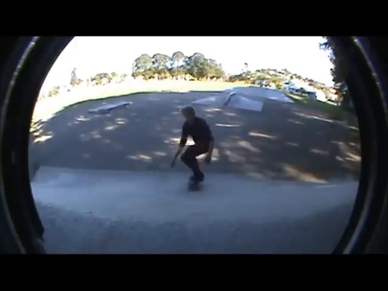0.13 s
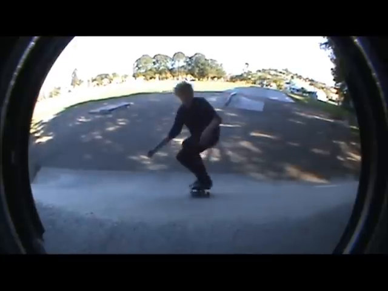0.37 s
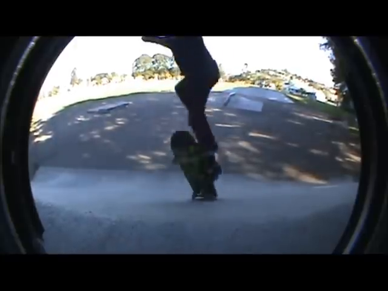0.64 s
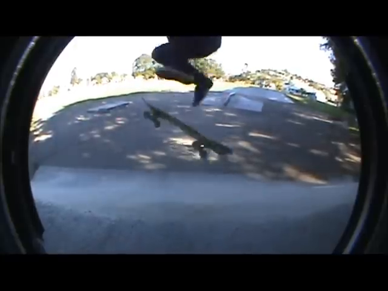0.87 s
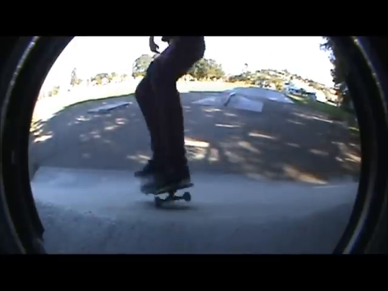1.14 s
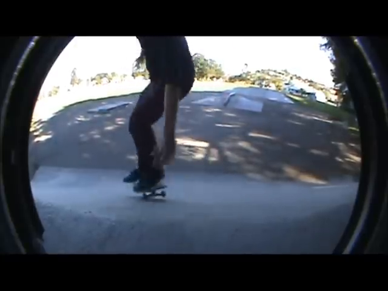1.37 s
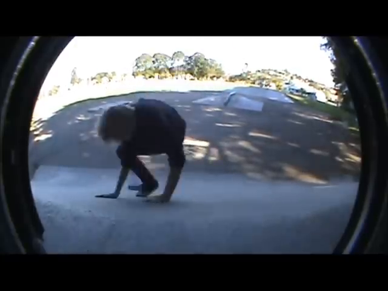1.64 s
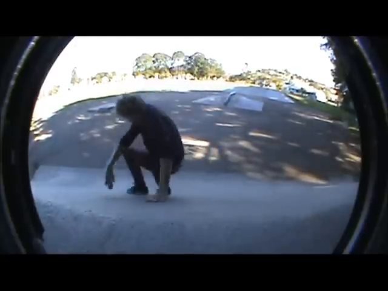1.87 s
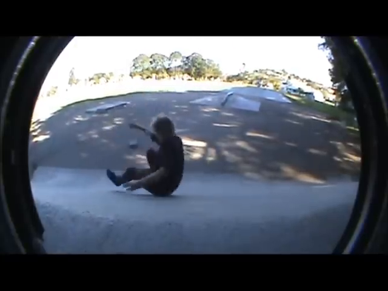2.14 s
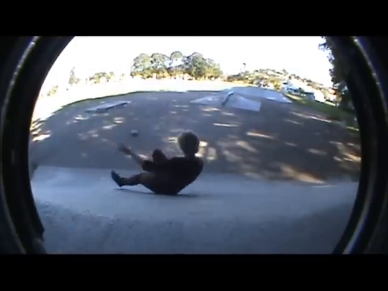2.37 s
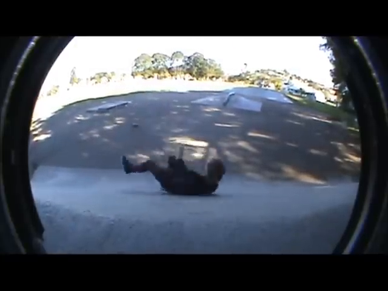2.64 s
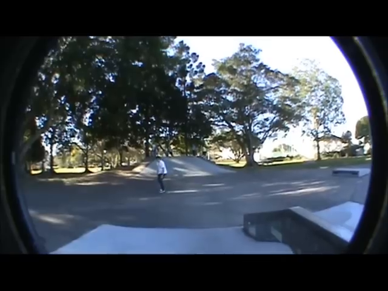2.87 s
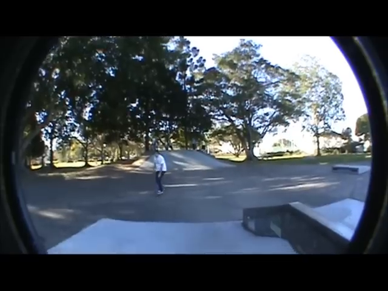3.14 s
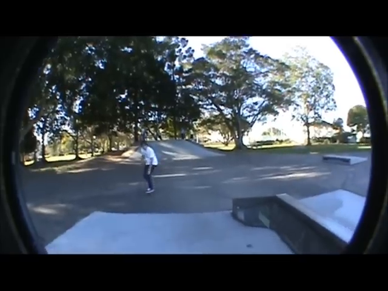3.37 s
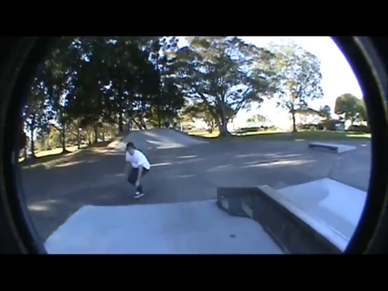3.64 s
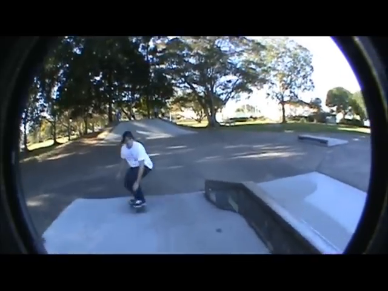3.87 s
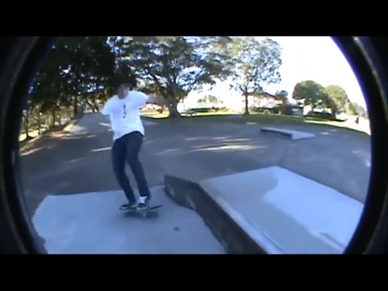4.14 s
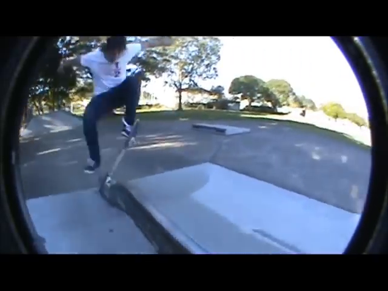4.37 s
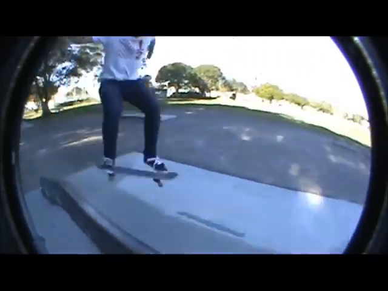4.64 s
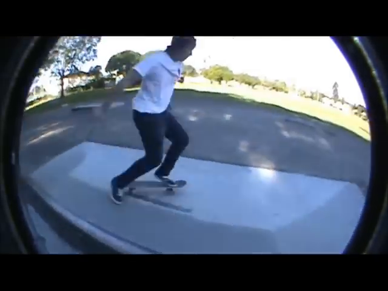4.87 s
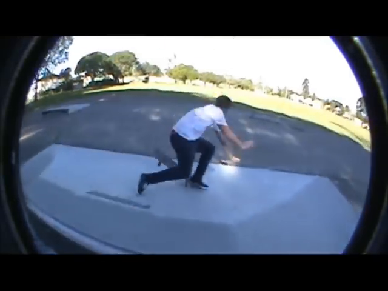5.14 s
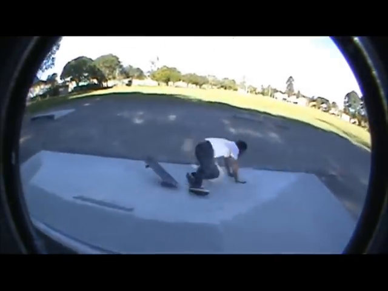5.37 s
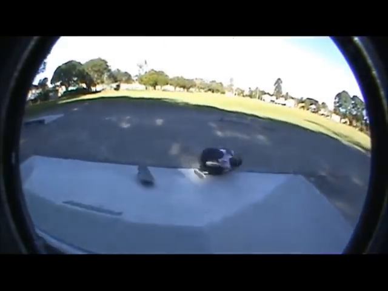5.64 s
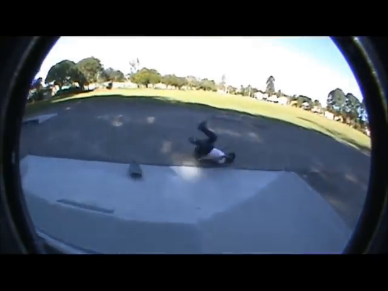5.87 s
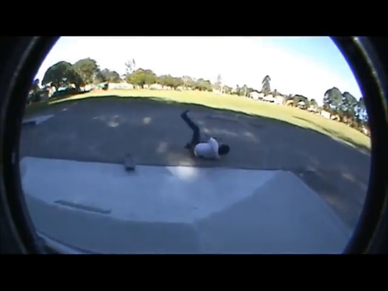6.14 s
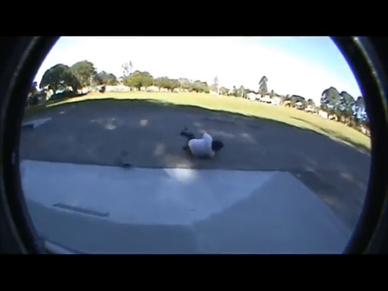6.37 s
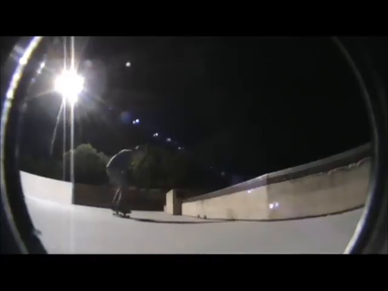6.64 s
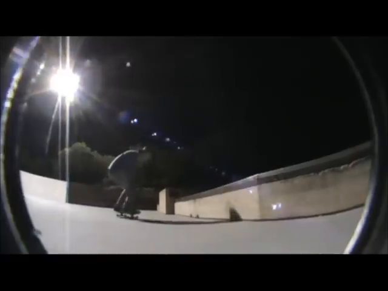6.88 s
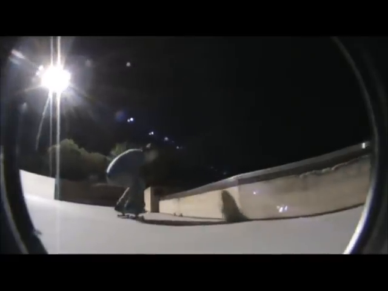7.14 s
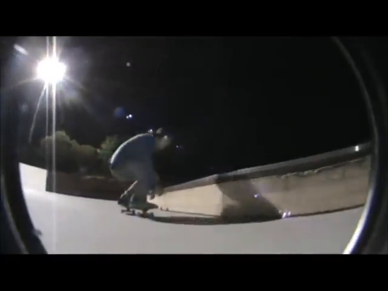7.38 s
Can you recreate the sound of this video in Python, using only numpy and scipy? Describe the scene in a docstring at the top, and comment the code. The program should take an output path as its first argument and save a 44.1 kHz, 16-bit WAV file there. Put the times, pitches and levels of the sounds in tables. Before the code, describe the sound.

Skateboard wheels roar over rough concrete, a sharp pop, clattering landing and scraping tumble, brief silence, a second trick and crash, then another roll.

```python
"""Three short takes at a skatepark, joined by silent gaps: a board rolls up, pops, lands and clatters
away, twice, the deck humming upward around the second pop; then a board rolls by.
Grit and blows drive noise through the colours of deck, wheels and metal trucks; struck modes ring.
Wind and ground rumble are low noise throughout; a far engine, three low sines, lies under two takes.
A close pair of microphone ports hears it all through a fast gain control."""
import sys
import numpy as np
from scipy import signal
from scipy.fft import rfft, irfft, next_fast_len
from scipy.io import wavfile
from scipy.ndimage import uniform_filter1d, map_coordinates

SR = 44100
rng = np.random.default_rng(int(sys.argv[2]) if len(sys.argv) > 2 else 0)


def wrap_up_sound(samples):
    """Save the sound to the file named by the first command line argument, as 16-bit audio."""
    columns = np.atleast_2d(samples).T
    # keep every value between -1 and 1, then stretch to whole-number steps
    tamed = np.clip(columns, -1, 1)
    steps = np.round(tamed * 32767).astype(np.int16)
    wavfile.write(sys.argv[1], SR, steps)


def natural_amplitude(level_db):
    """Convert a level in decibels to a linear amplitude factor, elementwise."""
    exponent = np.asarray(level_db, float) / 20
    return 10 ** exponent


N = 331054

# Silent gaps between the takes: start_s, end_s
GAPS = [(2.6405, 2.7068), (6.4898, 6.5775)]
# Borders of the eight stages (ride, trick, loose; ride, flight, landing, loose; ride): border_s
STAGES = [0, .535, 1.5, 2.68, 4.235, 4.752, 5.4, 6.53, 8]


def unit(x):
    """Normalisation: scale a signal to an rms of 1."""
    return x / np.sqrt(np.mean(x ** 2) + 1e-20)


def along(points, hz):
    """Logarithmic pitch scale: interpolate (frequency_hz, value) points on a log axis."""
    f, v = np.transpose(points)
    return np.interp(np.log(hz + 1), np.log(f + 1), v)


def curves(rows):
    """Linear interpolation in time: one value per sample for each column after time_s."""
    s, *cols = np.transpose(rows)
    return [np.interp(np.arange(N) / SR, s, c) for c in cols]


def wobble(rate):
    """Slow random modulation: a smooth random curve with the given number of knots a second."""
    knots = rng.standard_normal(int(N * rate / SR) + 4)
    return map_coordinates(knots, [np.arange(N) * rate / SR])


def response(spectrum, size=4096):
    """Minimum phase: the causal impulse response of energy 1 with the given colour."""
    level_db = np.maximum(along(spectrum, np.fft.rfftfreq(size, 1 / SR)), -70)
    cepstrum = irfft(np.log(natural_amplitude(level_db)))
    # folding the cepstrum onto positive time makes the response causal
    cepstrum[1:size // 2] *= 2
    cepstrum[size // 2 + 1:] = 0
    h = irfft(np.exp(rfft(cepstrum)))
    return h / np.linalg.norm(h)


def ring(force, colours, borders=STAGES):
    """Source and filter: each stretch of the force is convolved with that stretch's colour."""
    out = np.zeros((2, N + 4096))
    for a, b, colour in zip(borders, borders[1:], colours):
        first, last = round(a * SR), round(b * SR)
        piece = signal.fftconvolve(force[:, first:last], response(colour)[None], axes=1)
        out[:, first:][:, :piece.shape[1]] += piece  # the tail rings on into the next stretch
    return out[:, :N]


def grit(per_second, spread_db, t60):
    """Shot noise: stones met at random, each a sudden jolt that dies exponentially."""
    count = int(per_second * N / SR)
    sizes = natural_amplitude(spread_db * rng.standard_normal(count))
    stones = np.bincount(rng.integers(0, N, count), sizes, N)
    return unit(signal.lfilter([1], [1, -natural_amplitude(-60 / (t60 * SR))], stones))


def patchy(depth_db):
    """Non-stationary noise: two noises whose strength drifts in shared patches of pitch and time."""
    z = signal.stft(rng.standard_normal((2, N)), nperseg=512)[2]
    over_pitch = uniform_filter1d(rng.standard_normal(z.shape[1:]), size=4, axis=0)
    field = unit(uniform_filter1d(over_pitch, size=5, axis=1))
    return unit(signal.istft(z * natural_amplitude(depth_db * field), nperseg=512)[1][:, :N])


# Unbroken rolling or sliding, one table a spell: time_s, strength_db, deck_weight_db
RIDES = [
    [(0, -18.5, -5.5), (.2, -20.5, 0), (.37, -22.5, 5), (.43, -29.5, 6), (.52, -24, 3.5), (.56, -27, 0),
     (.597, -35, 7.5)],
    [(2.07, -41.5, 12), (2.1, -28.5, 5), (2.3, -27, -2), (2.46, -26.5, -2.5), (2.53, -28, -5),
     (2.575, -34, 1), (2.6, -28, -6.5), (2.645, -31, 0)],
    [(2.7, -24, -4.5), (2.8, -31, 2.5), (3.1, -26.5, 2.5), (3.33, -23, -3), (3.45, -23.5, -6),
     (3.66, -23.5, -0.5), (3.8, -21, -5), (3.95, -25, 3), (4.12, -23.5, -1.5), (4.225, -24.5, -10)],
    [(5.932, -23.5, -2), (6.1, -21, 1), (6.28, -21, -7), (6.31, -31, -5), (6.33, -20.5, -8.5),
     (6.37, -20.5, 13), (6.405, -31, -15), (6.42, -22.5, -6.5), (6.495, -27, 1)],
    [(6.57, -21, -8), (6.65, -18, -7), (6.8, -19, 2), (7.06, -19, -2), (7.18, -20.5, 2), (7.3, -17, -0.5),
     (7.51, -29, 10)],
]
# Short scrapes and touches of the ground: start_s, length_s, first_db, last_db, deck_weight_db
SCRAPES = [(0.596, 0.061, -30.5, -26, 4), (0.682, 0.051, -24.5, -23, -7.5), (0.736, 0.17, -24, -46, -7.5),
           (1.039, 0.062, -26.5, -26, -5.5), (1.143, 0.08, -22, -29.5, 2), (1.212, 0.08, -27, -35.5, 1),
           (1.255, 0.09, -30, -29, 3.5), (1.341, 0.07, -27.5, -21, 1), (1.545, 0.036, -40, -37, 6),
           (1.562, 0.044, -24, -32.5, 5.5), (1.605, 0.078, -17.5, -39, 4.5), (1.67, 0.052, -28, -29, 1),
           (1.736, 0.044, -24.5, -18.5, 3), (1.802, 0.047, -22, -21, 2), (1.863, 0.054, -24.5, -29, 9),
           (1.93, 0.035, -30.5, -20, -2.5), (1.975, 0.039, -20, -19.5, 3.5), (2.027, 0.03, -29.5, -28.5, 4),
           (4.247, 0.097, -21, -25, 2.5), (4.353, 0.088, -25.5, -37.5, -1), (4.486, 0.071, -33, -30, -8),
           (4.58, 0.14, -28, -34.5, -3), (4.762, 0.04, -24, -23, 3), (4.812, 0.051, -24.5, -31, 1),
           (4.853, 0.031, -25, -24, 1.5), (4.884, 0.096, -23, -24, -17), (5, 0.16, -19.5, -32, -6),
           (5.145, 0.13, -29.5, -41, -3.5), (5.416, 0.061, -27, -30, 1), (5.497, 0.05, -22, -19.5, 0.5),
           (5.56, 0.049, -20.5, -27, 6), (5.725, 0.12, -25, -30.5, 0), (5.854, 0.13, -27.5, -26, -10)]
# Gain for each dB of weight, for rumble, deck, wheels, trucks: gain_db_per_db
PER_WEIGHT = [1, 0.69, -0.035, -0.085]
# Share of the strength in each stage, the second loose one split at settling: rumble_db, deck_db, trucks_db
SHARE = [(-11.5, 6, -8.5), (-15, 4.5, -2.5), (-13.5, -3.5, -5.5), (-9, 9, -4.5), (-30, -1, -5.5),
         (-18, 2.5, -3.5), (-12, -6.5, -5.5), (-30.5, -11, -16), (-15, 1.5, -15)]
IDLE = [(-40.5, -43.5, -43, -39.5), (-45.5, -36.5, -34.5, -36)]


def shaking():
    """Addition of powers: contacts build up and let go exponentially; gives rumble, deck, wheels, trucks in dB."""
    touch_s, lift_s = 0.00049, 0.015  # time constants of contact and release
    settle_s = 5.68  # the fallen board stops skidding and rolls on its wheels
    t, power = np.arange(N) / SR, np.zeros((4, N))
    scrapes = [[(s, first_db, weight_db), (s + length, last_db, weight_db)]
               for s, length, first_db, last_db, weight_db in SCRAPES]
    for rows in RIDES + scrapes:
        s, db, weight_db = np.transpose(rows)
        span = slice(round(s[0] * SR), round(s[-1] * SR) + SR // 10)
        u = t[span]
        build_up = 1 - np.exp(-np.abs(u - s[0]) / touch_s)
        let_go = np.exp(-np.maximum(u - s[-1], 0) / lift_s)
        level_db = np.interp(u, s, db) + np.outer(PER_WEIGHT, np.interp(u, s, weight_db))
        power[:, span] += (build_up * let_go * natural_amplitude(level_db)) ** 2
    stage = np.searchsorted(sorted(STAGES + [settle_s]), t, side="right") - 1
    share = natural_amplitude(np.insert(np.transpose(SHARE), 2, 0, axis=0))[:, stage]  # wheels stay at 0 dB
    idle = natural_amplitude(np.transpose(IDLE))[:, (t > GAPS[0][1]).astype(int)]
    return 10 * np.log10(power * share ** 2 + idle ** 2)


# Colours of the deck, stage by stage, with extra borders at arrival, crouch and
# rougher ground: frequency_hz, level_db_per_hz
DECK = [
    [(110, -40), (180, -13), (433, -7.5), (478, -3.5), (953, -8.5), (1100, -36), (1430, -16), (2420, -120)],
    [(110, -40.5), (180, -2.5), (464, 0.5), (633, -2.5), (788, 5), (1100, -11), (1430, -33), (2420, -120)],
    [(110, -13.5), (180, -15.5), (294, -7), (450, -1), (620, -2.5), (760, -1), (883, 4.5), (1000, -3.5),
     (1150, -8), (1430, -53), (2420, -120)],
    [(110, -25), (180, -18), (380, -1), (520, -6.5), (760, 1.5), (1100, -15), (2420, -120)],
    [(110, -48), (180, -11), (313, -7), (378, -4.5), (536, -4), (700, 5.5), (790, 5.5), (930, -9),
     (1100, -20), (1430, -57), (2420, -120)],
    [(110, -31.5), (180, -10.5), (348, -12), (548, 3.5), (680, -0.5), (790, 2), (940, -15), (1100, -43),
     (1430, -42), (2420, -120)],
    [(110, -52), (180, -9), (318, -1.5), (440, -8), (782, 7.5), (1100, -31), (1430, -45), (2420, -120)],
    [(110, -43), (180, -10), (351, -10), (450, -6), (570, 2.5), (720, -5.5), (900, -10), (1100, -9),
     (1430, -54), (2420, -120)],
    [(110, -16.5), (180, -4.5), (221, -16), (269, -17.5), (430, -4.5), (530, 2.5), (650, 3), (1100, 0),
     (1430, -32), (2420, -120)],
    [(110, -28), (250, -8.5), (520, 2), (780, -6), (1000, -5), (1430, -36), (2420, -120)],
    [(110, -28), (180, -10), (443, 2.5), (482, -2.5), (528, 5.5), (578, 2.5), (1100, -1), (1430, -63),
     (2420, -120)],
]
# Colours of the wheels, with an extra border where the last board draws near: frequency_hz, level_db_per_hz
WHEELS = [
    [(590, -60.5), (1000, -14.5), (1470, -8.5), (1970, -28), (2130, -23.5), (3200, -36.5), (4160, -62),
     (7040, -120)],
    [(590, -30), (1000, -15), (1100, -1.5), (1400, 6), (1910, -7), (2600, -2.5), (3200, -43), (4160, -45),
     (7040, -120)],
    [(590, -38.5), (1000, -11.5), (1170, -9), (1400, 3), (1520, 3), (1690, 5), (1900, -4.5), (2600, -5.5),
     (3200, -22.5), (4160, -38), (7040, -120)],
    [(590, -16.5), (1000, 1), (1400, 0), (1580, 3), (1800, -3.5), (2920, -15), (3200, -17), (4160, -21),
     (7040, -120)],
    [(590, -36), (1000, -5), (1100, -14.5), (1180, -3), (1630, -5.5), (3200, -13), (4160, -40),
     (7040, -120)],
    [(590, -13.5), (1000, -1.5), (1100, -8.5), (1220, 0), (2110, -6), (3200, -11.5), (4160, -41.5),
     (7040, -120)],
    [(590, -21.5), (1000, -7.5), (1150, -9.5), (1350, -0.5), (1450, -1.5), (1580, 1.5), (1800, -4),
     (2200, -8), (2600, -7.5), (3200, -38.5), (4160, -56), (7040, -120)],
    [(590, -48), (1000, -8.5), (1300, -2.5), (1500, -5.5), (1700, 1.5), (2050, -15.5), (2600, -18.5),
     (3200, -31.5), (4160, -26), (7040, -120)],
    [(590, -45), (1000, -15), (1400, 3.5), (1550, -1.5), (1750, -3.5), (2050, -14.5), (2320, -14),
     (2600, -21), (3200, -39), (4160, -33), (7040, -120)],
]
# Colours of the trucks, stage by stage: frequency_hz, level_db_per_hz
TRUCKS = [
    [(1760, -59), (3000, -32), (3430, -4), (3750, -6.5), (4050, -17.5), (4410, -4.5), (4830, -1.5),
     (5560, -7), (7940, -10), (9800, -12), (14800, -23.5), (16000, -26)],
    [(1760, -6), (3000, -4.5), (3570, 1), (4110, -5), (4600, 1.5), (5920, -1.5), (7100, -5), (9870, -6),
     (14500, -20), (16000, -24)],
    [(1760, -23.5), (3000, -11), (3480, -7), (4140, -12), (4800, -2.5), (5920, -5), (6480, -11),
     (7050, -9.5), (9140, -15), (10100, -14.5), (14900, -24.5), (16000, -33)],
    [(1760, -24.5), (3000, -11), (4200, 1), (6480, -3.5), (7400, 0.5), (8280, -1), (9800, -10), (11100, -9),
     (13400, -16.5), (15100, -15), (16000, -32)],
    [(1760, -39), (3000, -29), (3430, -22), (3700, -0.5), (3970, -1.5), (4860, -8), (6950, -8),
     (8580, -10.5), (9400, -13.5), (12900, -20.5), (16000, -30)],
    [(1760, -7), (3000, -2), (3400, -2), (4630, 2), (5710, -5.5), (7350, -1), (10400, -9.5), (14400, -17.5),
     (16000, -19)],
    [(1760, -8), (3000, 0.5), (3480, -7), (4080, -1.5), (5180, -2), (5880, -7.5), (6950, -2), (9530, -10),
     (10500, -17.5), (12800, -15.5), (16000, -24)],
    [(1760, -34.5), (3000, -2.5), (4170, -3.5), (5070, -7), (5440, -8), (7670, -2.5), (9330, -10.5),
     (10500, -4), (12100, -16.5), (14200, -15.5), (16000, -23)],
]
# Coarseness of the ground in each stage: coarseness_ratio (1 = plain concrete)
COARSE = [0.97, 1.02, 0.86, 0.91, 0.85, 1.04, 1.23, 1.03]


def board():
    """Common excitation: the same stones and slab bumps shake deck, wheels and trucks."""
    arrive_s, crouch_s = 2.96, 3.62  # the second board comes close; its rider crouches, the deck rings lower
    nearer_s, rougher_s = 6.86, 6.98  # the last draws near, wheels sound lower; it meets rougher ground
    roll_patch_db = 0.8  # how unevenly deck and wheels roar
    _, deck_db, wheels_db, trucks_db = shaking()
    stage = np.searchsorted(STAGES, np.arange(N) / SR, side="right") - 1
    stones = grit(400, spread_db=4, t60=0.012) * np.array(COARSE)[stage]
    bumps_db = 0.6 * wobble(50)
    throb_db = 1.0 * np.sin(2 * np.pi * np.cumsum(82 + 8 * wobble(16)) / SR)  # the loaded deck throbs
    on_deck, on_wheels, on_trucks, wood = blows()
    # the trucks follow each stone most sharply
    deck = natural_amplitude(deck_db + bumps_db + throb_db) * unit(1 + 0.33 * stones) + on_deck
    wheels = natural_amplitude(wheels_db + bumps_db) * unit(1 + 0.32 * stones) + on_wheels
    trucks = natural_amplitude(trucks_db + bumps_db) * unit(1 + 0.5 * stones) + on_trucks
    deck_borders = sorted(STAGES + [arrive_s, crouch_s, rougher_s])
    deck_roar = ring(deck * patchy(roll_patch_db), DECK, deck_borders)
    wheel_roar = ring(wheels * patchy(roll_patch_db), WHEELS, sorted(STAGES + [nearer_s]))
    truck_rattle = ring(trucks * patchy(depth_db=2.5), TRUCKS)
    return deck_roar + wheel_roar + truck_rattle + wood * [[1], [0]]


# Colour of the ground's thunder: frequency_hz, level_db_per_hz
RUMBLE = [(53, -32), (90, -7), (145, 8), (230, 2), (300, -13), (510, -120)]
# Soft falls of a foot, hand or body: start_s, level_db
THUMPS = [(.495, -23), (.605, -28), (1.039, -24), (1.54, -33), (2.03, -35), (4.805, -25), (6.165, -43)]


def ground_rumble():
    """Amplitude modulation: low noise thunders in lumps under the wheels and swells at each thump."""
    s, db = np.transpose(THUMPS)[:, :, None]
    age = np.maximum(np.arange(N) / SR - s, 0) / 0.01  # each thump peaks after 10 ms
    thumps = np.sum(natural_amplitude(db) * age * np.exp(1 - age), axis=0)
    lumps = natural_amplitude(shaking()[0] + 2.5 * wobble(9))
    return (lumps + thumps) * ring(patchy(depth_db=1.5), [RUMBLE], borders=[0, N / SR])


# Strength of the wind before a fixed trim: time_s, level_db
WIND = [(0.0, -39), (0.29, -55), (0.4, -43.5), (2.23, -44.5), (2.55, -37.5), (3.72, -39), (6.35, -38),
        (6.6, -38), (7.5, -41)]
# Colour of the gusts: frequency_hz, level_db_per_hz
GUSTS = [(13, -41), (22, -16), (54, -10), (100, 1), (130, -28), (220, -120)]


def wind():
    """Turbulent pressure noise: patchy low noise buffets the ports, mostly below the rumble's pitch."""
    strength = natural_amplitude(curves(WIND)[0] - 5.0)
    return strength * ring(patchy(depth_db=4.0), [GUSTS], borders=[0, N / SR])


# Drone of the far engine, one table for each of its two takes and the approach to the second
# gap: time_s, pitch_hz, level_db
DRONE = [
    [(0.3, 70.3, -43), (0.52, 65.2, -48), (0.7, 73.2, -42.5), (1.32, 67.8, -48.5), (2.64, 70, -41.5)],
    [(2.71, 48.2, -37), (4.22, 49.36, -44), (4.46, 54.6, -52), (4.68, 51.6, -42), (5.45, 58.4, -42)],
    [(5.7, 65.1, -52), (6.11, 68, -35), (6.236, 65.3, -40.5), (6.49, 74.7, -48)],
]


def drone():
    hz, db = curves(np.vstack(DRONE))
    phase = 2 * np.pi * np.cumsum(hz * (1 + 0.0281 * wobble(7.2))) / SR
    orders = 0
    for k, level_db in enumerate([2, -2, -5], start=1):
        orders = orders + natural_amplitude(level_db + 2.2 * wobble(6.5)) * np.sin(k * phase)
    audible = np.arange(N) < GAPS[1][1] * SR
    return natural_amplitude(db) * orders * audible * [[1], [0.8]]


def struck(modes, t, chance):
    """Modal decay: modes (pitch_hz, level_db, t60_s) die out, each varied in strength and slightly in pitch."""
    return sum(natural_amplitude(db + 1.5 * c - 60 * t / t60) * np.sin(2 * np.pi * hz * (1 + 0.03 * c) * t)
               for (hz, db, t60), c in zip(modes, chance))


def jolt(level_db, t60, rise_s, t):
    """Transient envelope: a quick exponential rise under an exponential decay."""
    return natural_amplitude(level_db - 60 * t / t60) * (1 - np.exp(-t / rise_s))


# Strikes of the deck's hard edge, parts relative to the snap: start_s, edge_hz, snap_db, deck_db, wheels_db, trucks_db
POPS = [(0.6728, 3680, -12.5, -7, 3.5, -4), (0.684, 3540, -18.5, 6, -8, -3),
        (.7155, 3750, -16.5, 2, -7, -9), (1.0382, 2710, -14, -7, -7.5, -17), (4.2374, 3340, -16, 0, 7, -3),
        (4.245, 3520, -18.5, -10, -1, 11), (4.788, 2600, -28, 21.5, 13.5, -4),
        (4.9965, 2420, -27.5, 11, 6, 1), (5.077, 3010, -27, 11.5, 11, -1)]
# Landings, bounces and cracks in the ground, deck and trucks relative to the wheels:
# start_s, wheels_db, deck_db, trucks_db
KNOCKS = [(0.5454, -20, 1, -3), (0.561, -20, -4, 1), (0.6453, -10, 1, -21), (1.0437, -25.5, 12, -11),
          (1.06, -24, 10, 2), (1.079, -29, 11.5, 9), (1.1241, -19.5, 7, 5), (1.1379, -28.5, 17, 20.5),
          (1.167, -18, 10, -4), (1.18, -20, 11.5, -14.5), (1.195, -17.5, 10.5, -16),
          (1.204, -9.5, 6.5, -16), (1.228, -22, 10, -14), (1.5682, -26, 15.5, 2), (1.619, -18.5, 5.5, -1),
          (1.677, -12, 0, -2.5), (1.7302, -11.5, -5, -23), (1.823, -11, 0, -26), (1.884, -20, 6, -20),
          (1.907, -14.5, 3.5, -22), (1.764, -26, -10, -11), (1.852, -13.5, -9, -19), (2.044, -16, 4, -22),
          (2.0894, -16.5, -5, -27), (2.124, -15.5, -26, -5.5), (2.455, -16, -11, -15),
          (2.497, -21, -10, -13), (2.5205, -13.5, -3, 0.5), (2.5869, -16, -6, -12), (3.033, -24.5, 1, 9),
          (3.162, -29, -2.5, 10), (4.288, -29, -4, 10), (4.5904, -23, 4.5, 2), (4.7543, -13, 7.5, -2),
          (4.7732, -17, -1, -13), (4.859, -16, 3, -12), (4.868, -20, 9.5, -10), (4.888, -10, -6, -16),
          (5.01, -22, 14, -11), (4.903, -15, -3, -4), (4.914, -17, 2, 8), (4.982, -29, -18, 17.5),
          (5.223, -20.5, 9.5, 10), (5.286, -15, -9.5, -4), (5.36, -18.5, -2, -13), (5.4923, -16, 1.5, -28),
          (5.505, -16, -16, -17), (5.5795, -25.5, 2.5, -19.5), (5.6232, -16, -20, -21),
          (5.6485, -18.5, -22, -21), (5.7179, -13, -11, -8), (5.7713, -22, -20, 6), (5.781, -21, -15, -19),
          (5.8426, -14.5, -17.5, -14), (5.932, -22, -20, -0.5), (5.949, -14.5, -13, -10.5),
          (5.988, -17, -14, -2), (6.084, -13, -8.5, -5), (6.169, -37.5, 24.5, -10), (6.3646, -19.5, -4, 1),
          (6.4129, -13.5, -16, -24), (6.469, -13, -15, -20)]
# Body modes of the deck: pitch_hz, relative_db, t60_s
KNOCK = [(286, 1, 0.044), (542, 4, 0.049), (920, -1, 0.028)]
# How freely the three body modes sound in each stage, as feet, hands or ground hold
# the deck: low_db, middle_db, high_db
FREE = [(0, 0, 0), (0.5, -3, 3), (-3.5, -8, 8), (5, -3, 1), (4.5, -2, 9), (-7.5, 2.5, 1.5), (2.5, -2.5, -2),
        (0, 0, 0)]
# Modes of the hard edge: edge_pitch_multiple, relative_db, t60_s
SNAP = [(.78, -4, .016), (1, 0, .024), (1.35, -5, .014)]
# Modes of a struck wheel, relative to the blow on the wheels: pitch_hz, relative_db, t60_s
WHEEL_RING = [(1319, -4.5, 0.043), (1652, -7, 0.051)]
# Colour of the edge's broad crack, for an edge pitch of 4400 Hz: frequency_hz, relative_db
CRACK = [(300, -33), (1200, -8.5), (3600, 6.5), (5800, 5), (9000, -21)]


def blows():
    """Impact excitation: each blow shakes deck, wheels and trucks, and rings modes of wood and wheel."""
    knock_edge_hz, knock_snap_db = 4400, -25  # edge pitch of a knock; its snap relative to the wheels
    crack_db, crack_t60 = 0.5, 0.03  # the crack relative to the snap; its decay (s)
    out, t = np.zeros((4, N + SR)), np.arange(SR // 4) / SR
    rows = [(s, hz, db + deck, db + wheels, db, db + trucks)
            for s, hz, db, deck, wheels, trucks in POPS]
    rows += [(s, knock_edge_hz, db + deck, db, db + knock_snap_db, db + trucks)
             for s, db, deck, trucks in KNOCKS]
    chances = rng.standard_normal((len(rows), 8))
    for (s, edge_hz, deck_db, wheels_db, snap_db, trucks_db), chance in zip(rows, chances):
        deck = jolt(deck_db - 4.0, 0.025, 0.0018, t)
        wheels = jolt(wheels_db - 6.5, 0.045, 0.00038, t)
        trucks = jolt(trucks_db - 8.5, 0.034, 0.000077, t)

        free = FREE[np.searchsorted(STAGES, s) - 1]
        body_modes = [(hz, db + free_db, t60) for (hz, db, t60), free_db in zip(KNOCK, free)]
        swell = 1 - np.exp(-t / 0.003)  # the body answers after the edge
        body = natural_amplitude(deck_db - 2) * swell * struck(body_modes, t, chance[:3])

        edge_modes = [(k * edge_hz, db, t60) for k, db, t60 in SNAP]
        chatter = 1 + 0.15 * np.sin(2 * np.pi * (190 + 30 * chance[0]) * t)  # edge rebounds every few ms
        edge = natural_amplitude(snap_db) * chatter * struck(edge_modes, t, chance[3:6])
        wheel = natural_amplitude(wheels_db) * struck(WHEEL_RING, t, chance[6:])

        burst = natural_amplitude(snap_db + crack_db - 60 * t / crack_t60) * rng.standard_normal(len(t))
        crack_colour = [(hz * edge_hz / knock_edge_hz, db) for hz, db in CRACK]
        crack = signal.fftconvolve(burst, response(crack_colour))[:len(t)]
        wood = body + edge + wheel + crack
        out[:, round(s * SR):][:, :len(t)] += np.array([deck, wheels, trucks, wood])
    return out[:, :N]


# Upward hum of the deck around the second pop: time_s, pitch_hz, level_db
FLEX = [(3.98, 170, -44), (4.06, 185, -22), (4.18, 237, -21), (4.26, 269, -23), (4.31, 290, -44)]


def flex():
    """Narrow-band noise: a rough low band glides up as the deck is loaded."""
    hz, db = curves(FLEX)
    phase = 2 * np.pi * np.cumsum(hz) / SR
    rough = wobble(170) * np.sin(phase) + wobble(170) * np.cos(phase)
    sounding = db > -44  # silent at the end points and beyond
    return natural_amplitude(db + 2 * wobble(25)) * rough * sounding * [[1], [0]]


# Phase lead of the left port: frequency_hz, lead_rad
LEAD = [(60, -0.9), (130, -1.1), (240, -1.2), (420, -1), (720, -0.88), (1150, -0.55), (1800, -0.5),
        (2700, -0.12), (4000, 0.02), (16000, 0.15)]


def ports(sound, alike, tilt):
    """Interaural coherence: row 0 is shared, row 1 differs in sign; the ports add tilt and phase lead."""
    size = next_fast_len(N + SR // 2)
    hz = np.fft.rfftfreq(size, 1 / SR)
    shared, apart = rfft(sound, size)
    turn = np.arccos(np.clip(along(alike, hz), 0, 1)) / 2
    skew = natural_amplitude(along(tilt, hz) / 2) * np.exp(0.5j * along(LEAD, hz))  # half on each port
    left = (np.cos(turn) * shared + np.sin(turn) * apart) * skew
    right = (np.cos(turn) * shared - np.sin(turn) * apart) / skew
    return irfft([left, right], size)[:, :N]


# Left-right likeness in each take: frequency_hz, likeness_ratio
ALIKE = [
    [(60, .85), (130, .95), (240, .99), (720, .99), (1150, .89), (1800, .9), (2700, .85), (4000, .92),
     (6500, .97), (10000, .96), (14000, .84)],
    [(60, .5), (130, .85), (240, .98), (720, .97), (1800, .93), (4000, .98), (7000, .99), (10500, .56),
     (14000, .97)],
    [(60, .95), (420, .95), (720, .76), (1150, .7), (1800, .83), (2700, .75), (4000, .83), (6500, .77),
     (10000, .7), (14000, .28)],
]
# Left above right in each take, before the pan: frequency_hz, tilt_db
TILT = [
    [(50, -4), (110, -2), (480, -1.5), (800, -1), (1250, 3), (1800, 3), (2700, -3), (3800, 1.5), (14000, 1)],
    [(50, -5), (240, -2), (480, 0), (1250, -0.1), (14000, 0.5)],
    [(50, -2), (110, -3), (240, 0.5), (1250, 2), (14000, 1.5)],
]
# Broadband pan, left above right: time_s, pan_db
PAN = [(0.0, -2), (0.6, -1.5), (2.23, 0.5), (2.86, -1.4), (4.4, 0.5), (5.0, -1), (6.43, 0), (7.5, -1)]


def scene():
    """Superposition: the sources add up, and each take reaches the ports in its own way."""
    sound = board() + ground_rumble() + wind() + drone() + flex()
    take = np.searchsorted(np.mean(GAPS, axis=1), np.arange(N) / SR)
    heard = sum(ports(sound, alike, tilt) * (take == k)
                for k, (alike, tilt) in enumerate(zip(ALIKE, TILT)))
    half_pan_db = curves(PAN)[0] / 2
    return heard * natural_amplitude(3.5 + np.array([half_pan_db, -half_pan_db]))


def gain_control(x):
    """Dynamic compression: gain falls as the mean power, smoothed over 300 samples, rises."""
    power = signal.lfilter([1 / 300], [1, 1 / 300 - 1], np.mean(x ** 2, axis=0))
    level = np.sqrt(power + 1e-12)
    return x / (1 + (level / natural_amplitude(-13.0)) ** 2) ** 0.37


def top_cut(x):
    """Nothing passes above the cut-off."""
    return signal.sosfilt(signal.butter(12, 17050, fs=SR, output="sos"), x)


def record(dry):
    """Non-linear transmission: gain control, soft clipping, silent gaps, then loss of the top band."""
    t = np.arange(N) / SR
    running = np.prod([(t < a) | (t > b) for a, b in GAPS], axis=0)
    tamed = gain_control(dry)
    soft = tamed / (1 + np.abs(tamed / 0.85) ** 6) ** (1 / 6)  # peaks round off towards 0.85
    low_pass = signal.ellip(11, 0.5, 70, 15750, fs=SR, output="sos")
    mix = signal.sosfilt(low_pass, soft * running)
    return top_cut(mix)


dry = scene()
out = record(dry)
wrap_up_sound(out)
```